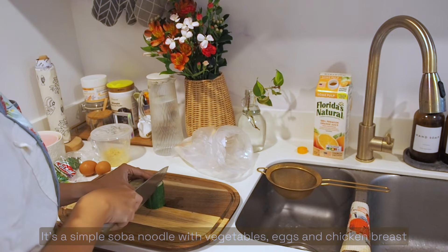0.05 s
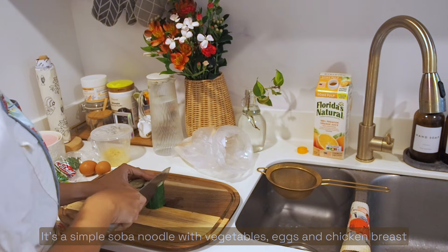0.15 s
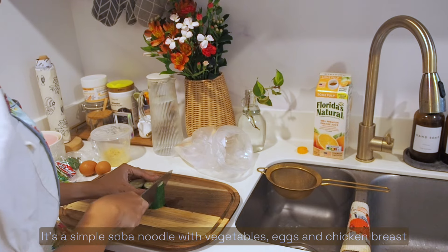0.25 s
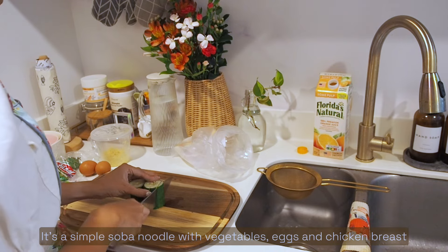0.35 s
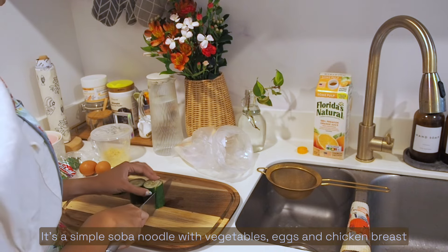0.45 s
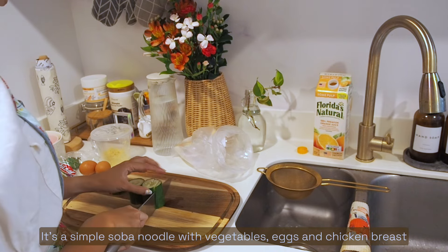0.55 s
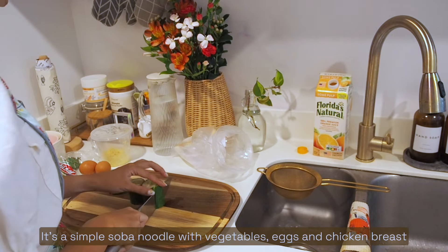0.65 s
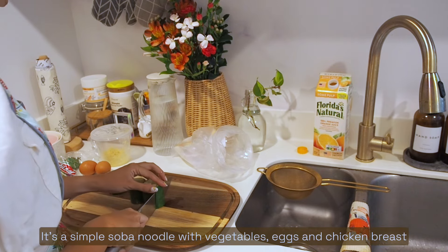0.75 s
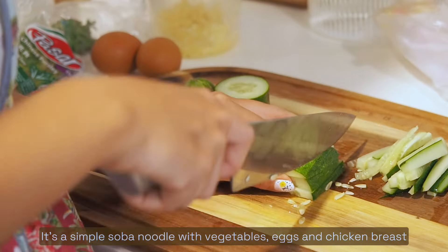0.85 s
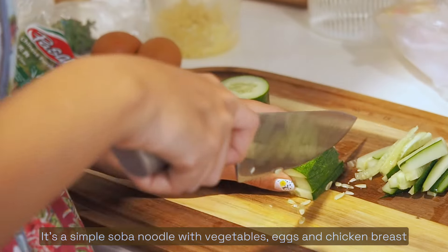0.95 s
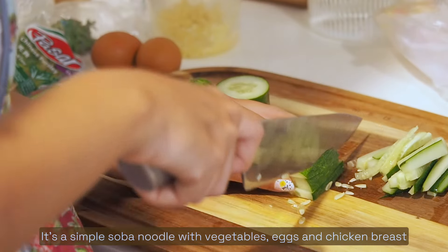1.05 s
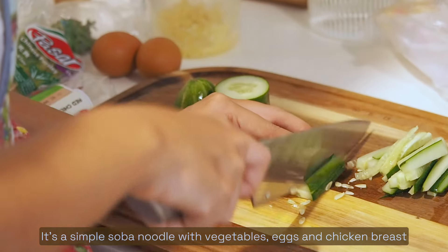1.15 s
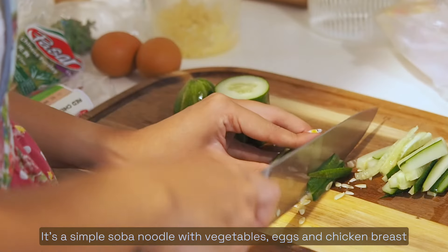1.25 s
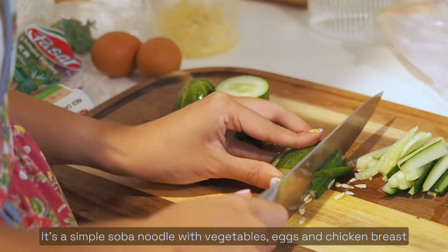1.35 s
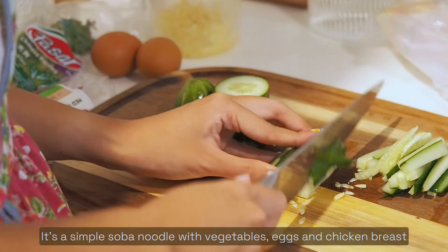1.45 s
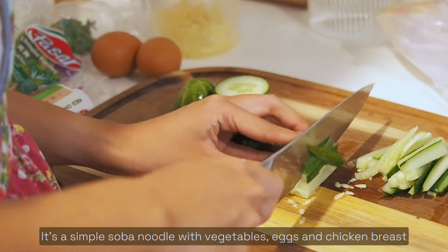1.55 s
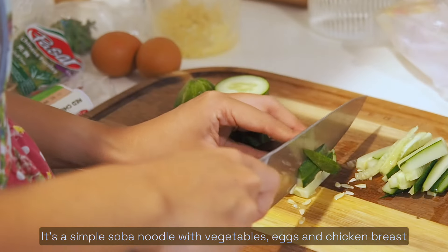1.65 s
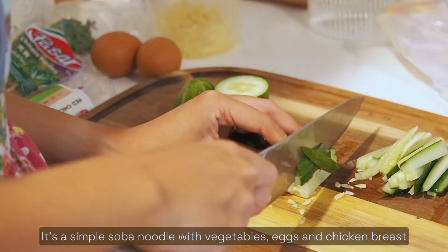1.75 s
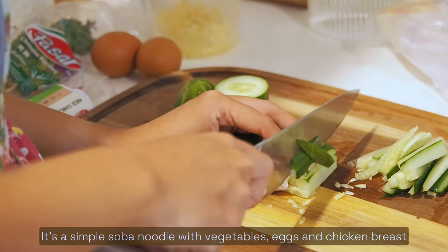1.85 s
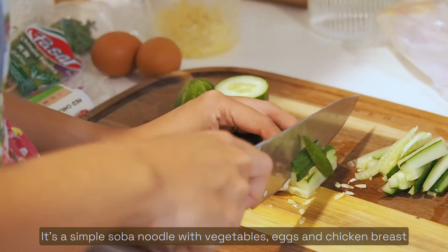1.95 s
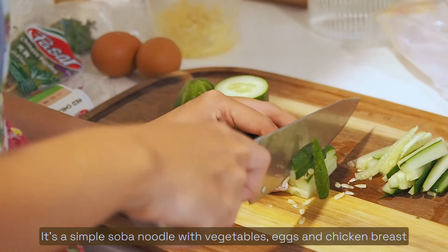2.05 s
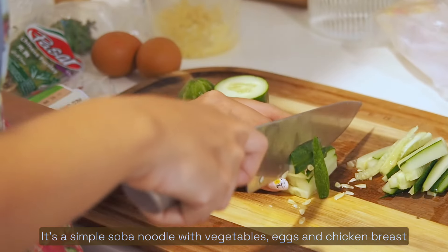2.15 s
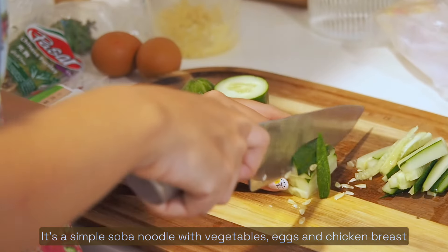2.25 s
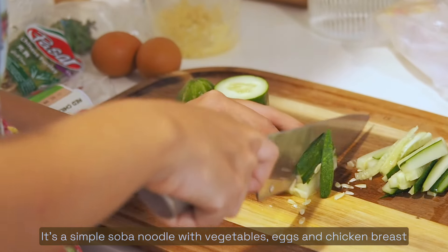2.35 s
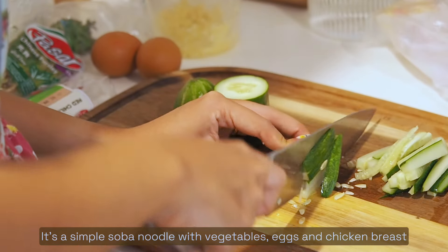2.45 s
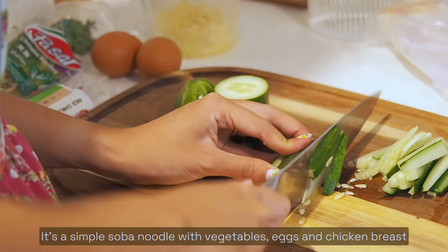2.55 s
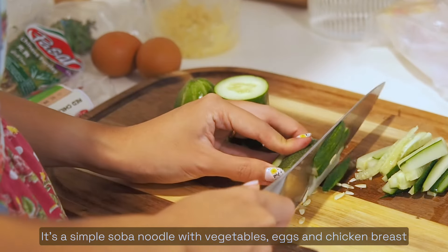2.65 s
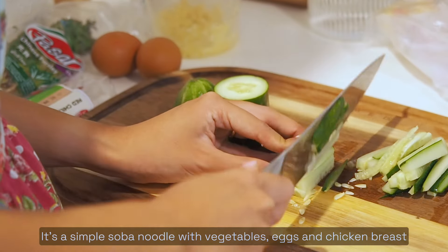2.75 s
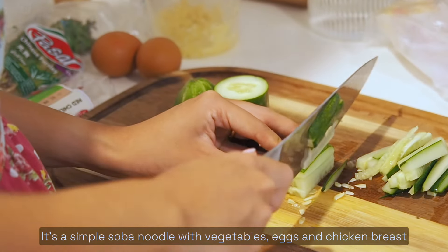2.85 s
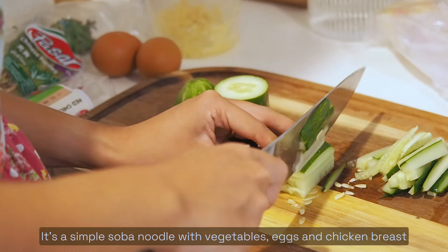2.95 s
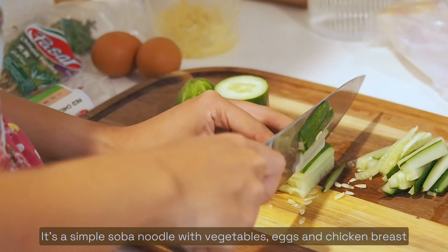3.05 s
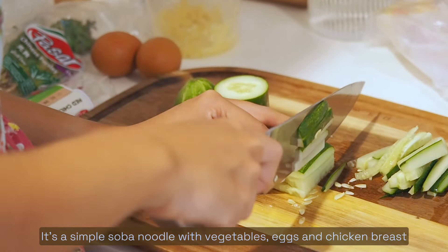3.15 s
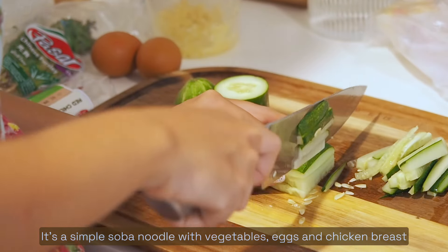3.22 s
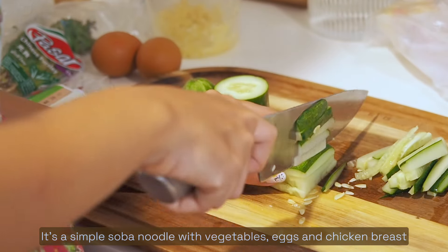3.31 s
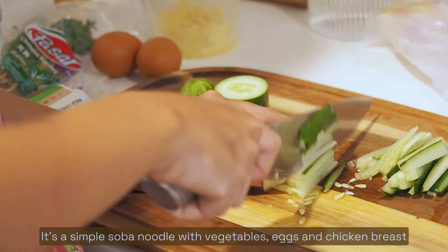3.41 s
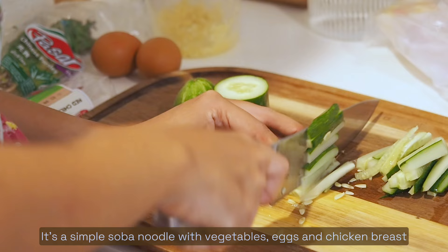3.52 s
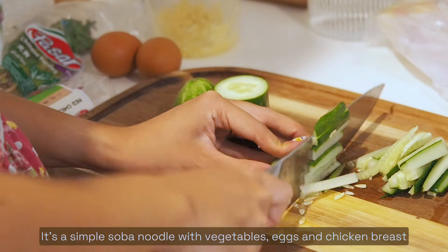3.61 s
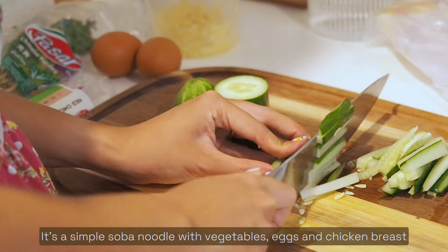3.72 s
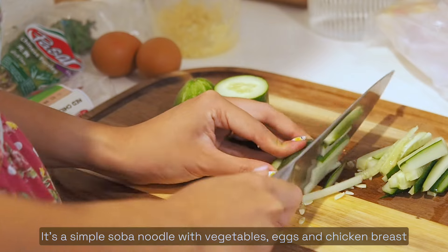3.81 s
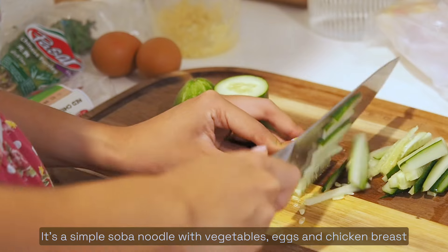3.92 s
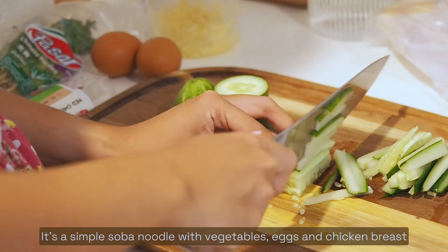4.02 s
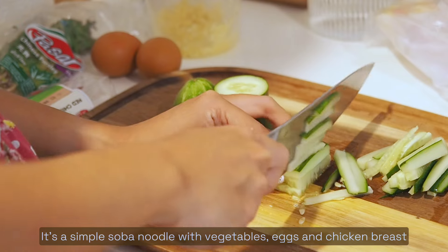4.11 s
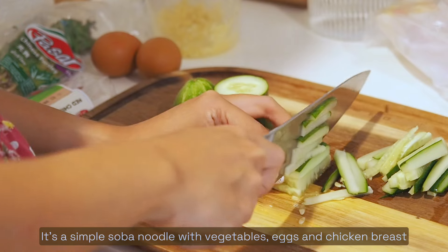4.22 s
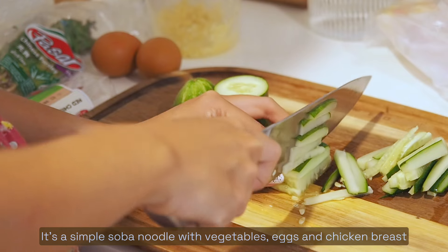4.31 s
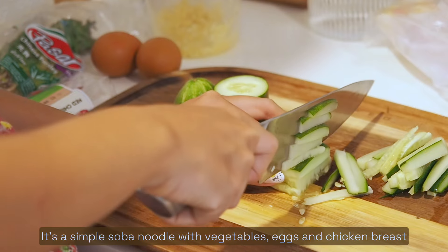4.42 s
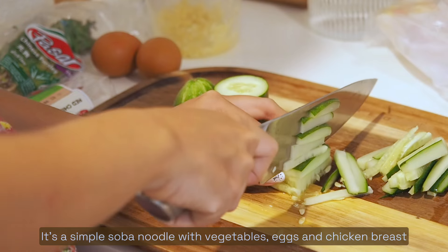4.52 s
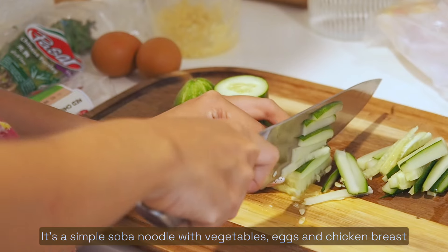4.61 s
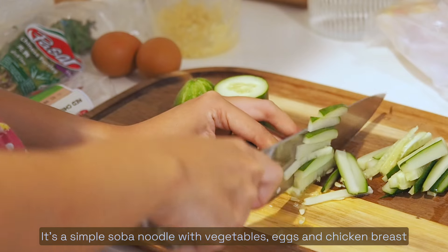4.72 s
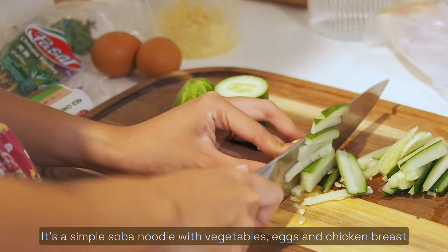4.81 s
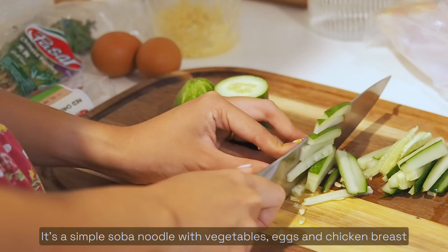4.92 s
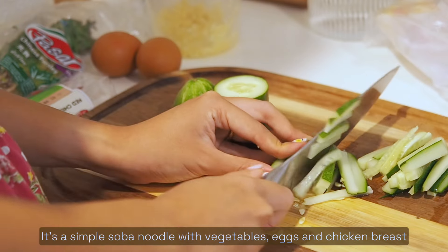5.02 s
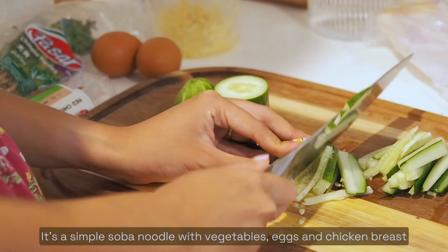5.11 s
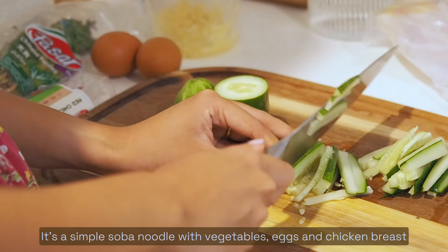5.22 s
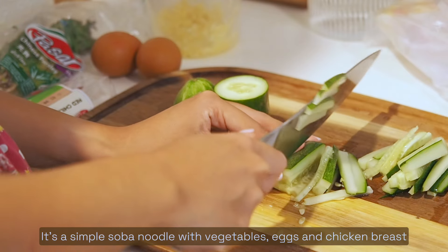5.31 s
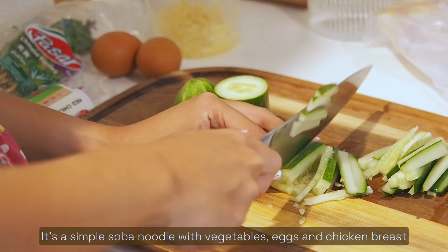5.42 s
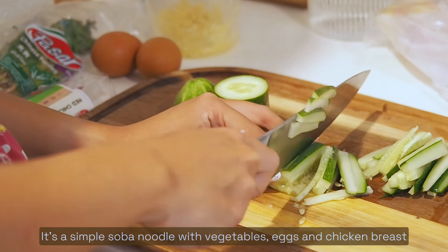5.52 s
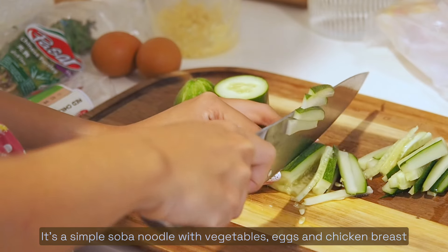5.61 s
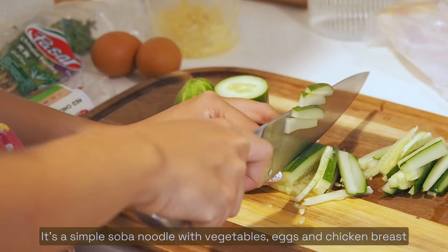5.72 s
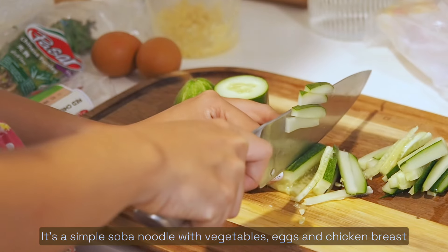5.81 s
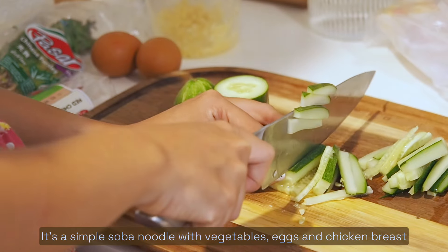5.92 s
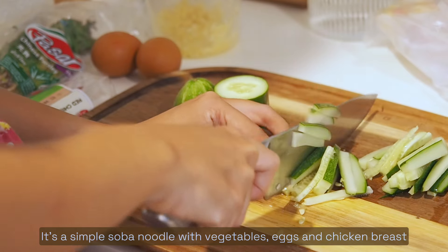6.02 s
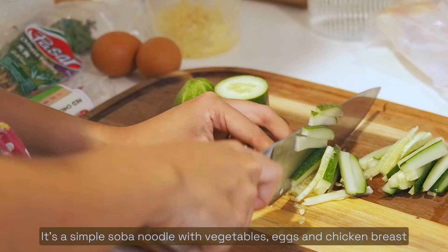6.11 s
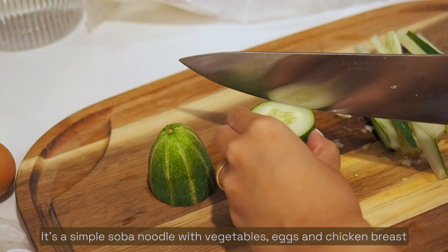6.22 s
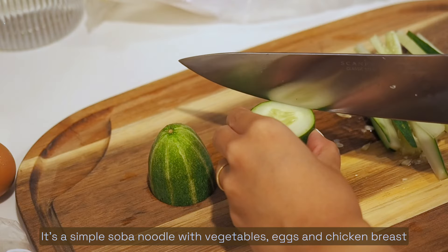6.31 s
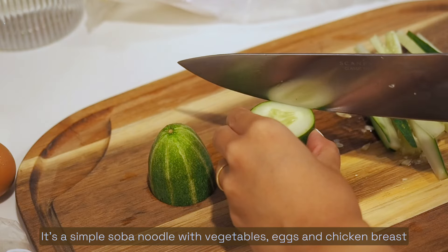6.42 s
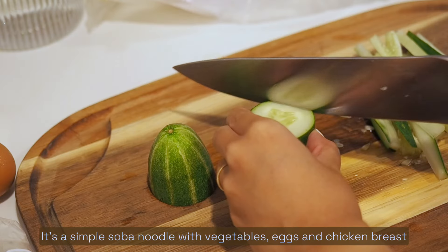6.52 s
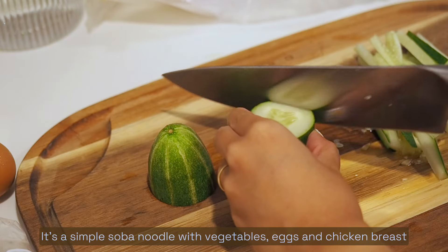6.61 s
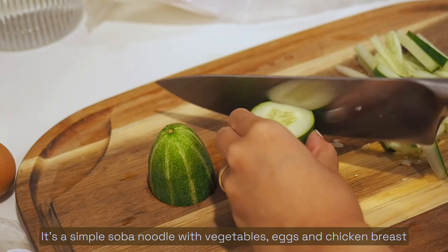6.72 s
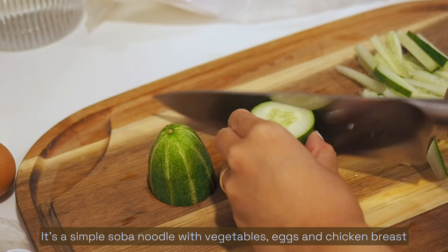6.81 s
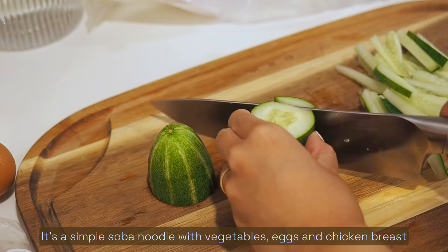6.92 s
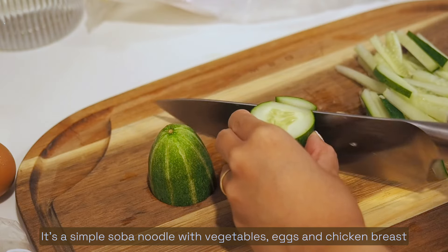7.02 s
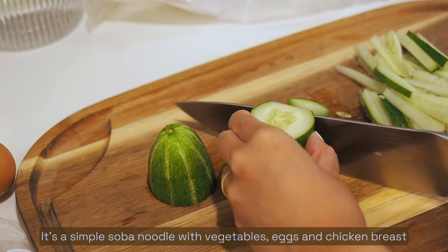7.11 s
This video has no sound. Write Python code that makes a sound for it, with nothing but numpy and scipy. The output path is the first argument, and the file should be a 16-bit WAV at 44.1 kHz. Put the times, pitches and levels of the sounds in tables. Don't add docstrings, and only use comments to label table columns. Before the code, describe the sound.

Slow, spaced cucumber slicing with crisp wet crackle and woody knife knocks, first beside a hissing gas flame, then over low fan noise.

```python
import sys
import numpy as np
from scipy import signal
from scipy.fft import rfft, irfft, next_fast_len
from scipy.io import wavfile

SR = 44100
rng = np.random.default_rng(int(sys.argv[2]) if len(sys.argv) > 2 else 0)


def invert_db(level):
    return 10 ** (np.asarray(level, dtype=float) / 20)


def store_wav(level_fs):
    pcm = np.round(np.clip(np.atleast_2d(level_fs), -1, 1) * 32767)
    wavfile.write(sys.argv[1], SR, pcm.T.astype(np.int16))


N = 315756

# start t/s, end t/s
SHOTS = [
    (0.0, .881),
    (.885, 6.18),
    (6.181, 7.2),
]

# f/Hz, level/dB (per Hz)
BURNER_SPECTRUM = [(18, -43), (30, -12), (98, -7), (127, -17), (203, -8), (402, -19), (550, -12),
                   (1240, -11.5), (1410, -7.5), (1610, -13.5), (3270, -13), (7960, -22), (10300, -23),
                   (15700, -29)]
# f/Hz, width/Hz, level/dB
BURNER_RESONANCES = [(2556, 80, -11.5), (3170, 260, -19.5), (3390, 420, -7.5), (3820, 180, -13),
                     (7800, 230, -11.5)]
# t/s, hiss level/dB
JET_LEVEL = [(0, -41.5), (.39, -39.5), (.56, -43.5), (.88, -41)]
# start t/s, end t/s, entry level/dB, final level/dB
PORT_SONGS = [(-.05, .12, -49, -54), (0.165, .3, -43, -50), (.3, .6, -52, -56), (.62, .88, -43, -49.5)]

# f/Hz, level/dB (per Hz)
SLICE_SPECTRUM = [(710, -21), (1200, -8), (1950, -6.5), (2700, -4.5), (5800, -2.5), (10200, -3),
                  (13000, -6), (14600, -9), (15300, -14), (15800, -22)]
# start t/s, end t/s, entry level/dB, final level/dB, brightness/dB
STROKES = [(-.05, 0.428, -49, -46, 5), (0.59, 0.853, -48, -55, 3), (0.972, 1.17, -51.5, -42, -3),
           (1.21, 1.307, -47.5, -52.5, -5), (2.217, 2.39, -45.5, -44.5, -4),
           (2.41, 2.553, -50, -51.5, -5.5), (3.338, 3.4, -50, -45, -4.5), (3.393, 3.46, -38.5, -38.5, -0.5),
           (3.508, 3.6, -46, -50, -1), (4.54, 4.645, -52, -47, -5.5), (4.643, 4.675, -46, -37, -4.5),
           (5.96, 6.016, -41.5, -36, -2.5), (6.437, 6.688, -49.5, -46.5, -3.5),
           (6.684, 6.862, -47, -36.5, -3.5), (7.018, 7.2, -49, -53.5, -3)]
# t/s, peak level/dB
SNAPS = [(4.4695, -21.5), (4.538, -15.5), (4.5894, -34), (5.2085, -24), (5.44, -29), (5.866, -23.5),
         (6.4517, -32)]

BLOW_TIMES = [
    .4277,
    1.1703,
    2.3797,
    2.5860,
    3.4783,
    4.6889,
    6.0099,
    6.8732,
]
# peak level/dB, thud level/dB, edge level/dB, extra damping/(dB per s)
BLOWS = [(-5.5, -14, -0.5, 26), (-9.5, -0.5, 2, 9), (-11.5, 0, 0.5, 12), (-24.5, 2, 5, 16),
         (-17, 2, -0.5, -15), (1, -11, -9.5, 15), (-2.5, -3.5, 2, -3), (-12, -4, 2, 9)]
LANDINGS = ["far", "soft", "soft", "heel", "stack", "hard", "hard", "tip"]
DIRECT_CLICKS = [-6.5, -7, -7, -5.5, -9, -3, -2, -6.5]
CONTACT_CUTOFF = {"far": 3000, "soft": 3700, "stack": 3000, "heel": 2800, "hard": 6560, "tip": 3530}
# delay t/s, level/dB
HEEL_ROCKING = [
    (.0125, -5.5),
    (.023, -4),
    (.05, -12),
]

# f/Hz, level/dB, t60/s
MODES_FAR = [(482, 0, .3), (517, -1, .3), (580, -4, .27), (640, -6, .27), (732, -3, .07), (797, -8, .2),
             (838, -4, .25), (940, -6, .18), (1120, -9, .22), (1370, -5, .12), (1470, -7, .11),
             (1674, -18, .25), (2003, -20, .2), (2450, -20, .15)]
# f/Hz, level/dB, t60/s
MODES_SOFT = [(237, -13, .4), (315, -14, .45), (385, -5, .15), (515, -4, .22), (575, -3, .25),
              (637, -4, .4), (836, -6, .25), (910, -3, .15), (958, 0, .16), (1120, -7, .2),
              (1324, -14, .25), (1860, -15, .2), (2290, -12, .12), (3480, -22, .08)]
# f/Hz, level/dB, t60/s
MODES_HEEL = [(113, -8, .45), (215, 0, .25), (301, -5, .45), (365, -4, .35), (446, -3, .35), (510, -8, .3),
              (958, -18, .2), (1771, -12, .12), (2100, -14, .06)]
# f/Hz, level/dB, t60/s
MODES_STACK = [(231, -8, .25), (318, -18, .42), (484, -3, .34), (512, -5, .34), (570, -7, .3),
               (635, -8, .32), (721, -2, .12), (840, -3, .15), (930, -5, .15), (1120, -9, .2),
               (1324, -22, .3), (2062, -20, .15), (2320, -15, .08)]
# f/Hz, level/dB, t60/s
MODES_HARD = [(188, -12, .5), (395, -14, .4), (506, -6, .33), (563, 0, .2), (725, -9, .35), (840, -11, .25),
              (910, -5, .33), (958, -5, .2), (1120, -4, .28), (1225, -9, .15), (1320, -9, .24),
              (1490, -12, .2), (1663, -15, .45), (1857, -6, .14)]
# f/Hz, level/dB, t60/s
MODES_BLADE = [(2008, -5, .4), (2132, 2, .12), (2347, 5, .13), (2530, 1, .21), (2670, 4, .1),
               (2885, -4, .3), (3235, -8, .3), (3343, 0, .3), (3418, -1, .09), (3600, -2, .2),
               (4091, -5, .08), (4484, -3, .13), (4716, -6, .35), (5276, -8, .12)]
# f/Hz, level/dB, t60/s
MODES_TIP = [(409, -2, .31), (500, -8, .35), (565, -8, .42), (630, -6, .4), (700, -5, .3), (790, -8, .35),
             (888, 0, .16), (1066, -9, .25), (1130, -4, .18), (1254, -6, .1), (1432, -16, .3),
             (1653, -16, .2), (1965, -14, .15), (2126, -20, .2)]

# f/Hz, level/dB (per Hz)
ROOM_FAR = [(71, -57), (120, -17), (393, -3.5), (499, -0.5), (700, -4), (900, -1.5), (1400, -6), (1750, -8),
            (2300, -12), (2750, -35), (4500, -52), (7700, -90)]
# f/Hz, level/dB (per Hz)
ROOM_SOFT = [(71, -54), (120, -23), (230, -10), (330, -12), (430, -7.5), (580, -2), (770, -10.5),
             (941, -5.5), (1250, -12), (1600, -31), (1900, -17), (2350, -15), (2800, -28), (6500, -34)]
# f/Hz, level/dB (per Hz)
ROOM_HEEL = [(29, -36), (50, -7), (318, 3.5), (620, -8), (711, -19), (889, -11), (1320, -15), (1540, -29),
             (1790, -12), (3000, -29), (3900, -67), (6600, -120)]
# f/Hz, level/dB (per Hz)
ROOM_STACK = [(71, -54), (120, -33), (199, -10), (365, -20), (481, -4), (777, -8), (1000, -7), (1570, -25),
              (2300, -15), (2900, -30), (4160, -50), (7040, -100)]
# f/Hz, level/dB (per Hz)
ROOM_HARD = [(35, -57), (60, -21), (193, -11), (277, -20.5), (569, -6.5), (700, -11.5), (1120, -8.5),
             (1500, -15.5), (2200, -12.5), (3550, -17.5), (3800, -27.5), (4600, -21), (6500, -33),
             (13000, -43)]
# f/Hz, level/dB (per Hz)
ROOM_TIP = [(88, -45), (150, -6.5), (345, -12.5), (402, 0), (487, -7), (878, -9.5), (1130, -12.5),
            (1800, -22.5), (3200, -31), (4160, -59), (7040, -120)]
# f/Hz, t60/s
REVERBERATION = [(100, 0.55), (200, 0.42), (300, 0.37), (500, 0.43), (950, 0.41), (2000, 0.32),
                 (3450, 0.44), (3900, 0.33), (5500, 0.38), (8500, 0.24)]

# f/Hz, level/dB (per Hz)
FAN_AIR_SPECTRUM = [(150, -5.5), (260, -1), (340, -7.5), (420, -4), (520, -3), (650, 0), (1100, -1.5),
                    (1900, -5.5), (2150, -10.5), (4500, -14.5), (7000, -16), (9300, -16), (12600, -18),
                    (15700, -21)]
# f/Hz, level/dB (per Hz)
FAN_RUMBLE_SPECTRUM = [(12, -46), (20, -8), (22, -14), (59, 2), (242, 2.5), (278, -20.5), (315, 3.5),
                       (336, -26), (400, -5.5), (520, -7.5), (880, -120)]
# f/Hz, width/Hz, level/dB
DUCT_RESONANCES = [(148.6, 9.8, -27), (723, 4.3, -14), (1417, 39, -12), (1745, 31, -14.5),
                   (3590, 16, -21.5), (4164, 55, -22), (4780, 35, -19), (5860, 10, -26.5), (8400, 770, -15),
                   (9300, 190, -14)]
# f/Hz, width/Hz, level/dB
LAST_SHOT_RESONANCES = [(82.9, 4.6, -6.5), (136.6, 15, -6.5), (12600, 400, -16)]
# air level/dB, rumble level/dB, drift/(dB per s)
FAN_BY_SHOT = [
    (-44.5, -47, -0.24),
    (-47, -47.5, 2.5),
]

# f/Hz, correlation
LIKENESS = [(60, 0.94), (300, 0.93), (800, 0.82), (2000, 0.22), (5000, 0.015), (12000, 0.014)]
# f/Hz, left minus right level/dB
CAPSULE_BALANCE = [(60, 2), (180, 0), (550, 1.5), (1650, 0), (4970, 1), (15000, 1.0)]
# f/Hz, width/Hz, share removed
HOUSING_NOTCHES = [(6540, 820, 0.93), (10330, 1090, 1), (10450, 1600, 0.72)]


def rms_one(x):
    return x / np.sqrt(np.mean(x ** 2) + 1e-20)


def at_hz(points, hz):
    f, value = np.transpose(points)
    return np.interp(np.log(hz), np.log(f), value)


def butterworth(x, order, hz, kind="low"):
    return signal.sosfilt(signal.butter(order, hz, kind, fs=SR, output="sos"), x)


def spectrum_axis():
    size = next_fast_len(N)
    return size, np.maximum(np.arange(size // 2 + 1) * SR / size, 1)


def shot(k):
    start, end = SHOTS[k]
    t = np.arange(N) / SR
    return np.clip((t - start) / 0.01 + (k == 0), 0, 1) * np.clip((end - t) / 0.002, 0, 1)


def swell(start, end, entry_db, final_db, rise_s, fade_db_per_s):
    t = np.arange(N) / SR
    level_db = np.interp(t, [start, end], [entry_db, final_db])
    level_db = level_db - fade_db_per_s * np.maximum(t - end, 0)
    return np.clip((t - start) / rise_s, 0, 1) * invert_db(level_db)


def drift(rate_hz):
    knots = rng.standard_normal(int(N / SR * 40) + 2)
    r = np.exp(-2 * np.pi * min(rate_hz, 15) / 40)
    walk = rms_one(signal.lfilter([1], [1, -r], knots))
    return np.interp(np.arange(N) / SR * 40, np.arange(len(knots)), walk)


def stereo(mid, side, alike):
    return np.sqrt(1 + alike) * mid + np.sqrt(1 - alike) * side * [[1], [-1]]


def coloured(spectrum, white, wide=1.0):
    size, hz = spectrum_axis()
    alike = np.clip(1 - wide * (1 - at_hz(LIKENESS, hz)), 0, 1)
    mid, side = rfft(white, size) * invert_db(at_hz(spectrum, hz))
    return rms_one(irfft(stereo(mid, side, alike), size)[:, :N])


def resonances(peaks, flicker_db):
    out, white = 0, coloured([(10, 0), (22000, 0)], rng.standard_normal((2, N)))
    for hz, width_hz, level_db in peaks:
        b, a = signal.iirpeak(hz, hz / width_hz / 1.55, SR)
        tone = rms_one(signal.lfilter(b, a, signal.lfilter(b, a, white)))
        out = out + tone * invert_db(level_db + flicker_db * drift(3.7))
    return out


def singing_port():
    carrier = np.exp(2j * np.pi * 1453 * np.arange(N) / SR)
    noise = rng.standard_normal(N) + 1j * rng.standard_normal(N)
    waver = signal.lfilter([1], [1, -.9987], noise)
    breath = 1.7 + rms_one(waver.real) + 1j * rms_one(waver.imag)
    sings = sum(swell(*row, rise_s=0.046, fade_db_per_s=120) for row in PORT_SONGS)
    return sings * rms_one((carrier * breath).real)


def burner():
    hiss_db = np.interp(np.arange(N) / SR, *np.transpose(JET_LEVEL))
    jet = coloured(BURNER_SPECTRUM, rng.standard_normal((2, N)), wide=1.2)
    jet = jet + resonances(BURNER_RESONANCES, flicker_db=-0.5)
    return invert_db(hiss_db + 5.0) * jet + invert_db(1.5) * singing_port()


def bursting_cells():
    fires = rng.random((2, N)) < 2500 / SR
    strength = invert_db(1.9 * np.minimum(rng.exponential(1, (2, N)), 4))
    bursts = fires * strength * rng.choice([-1, 1], (2, N))
    crunch = coloured(SLICE_SPECTRUM, 0.8 * rms_one(bursts) + rng.standard_normal((2, N)), wide=0.82)
    sheen = butterworth(crunch, 2, 12400, "high")
    return crunch + shot(2) * (invert_db(5) - 1) * sheen


def slicing():
    t = np.arange(N) / SR
    power = np.array([swell(*row[:4], rise_s=0.018, fade_db_per_s=200) ** 2 for row in STROKES])
    brightness_db = np.array(STROKES)[:, 4]
    top_gain = np.sqrt(power.sum(axis=0))
    body_gain = np.sqrt(invert_db(-2 * brightness_db) @ power)
    crunch = bursting_cells()
    low = butterworth(crunch, 2, 5000)
    high = crunch - low
    strokes = invert_db(3.5 + 1.5 * drift(15)) * (top_gain * high + body_gain * low)

    snap_gain = np.zeros(N)
    for s, peak_db in SNAPS:
        rise = np.clip((t - s) / .004 + 1, 0, 1)
        snap_gain += invert_db(peak_db - 13) * np.exp(-np.maximum(t - s, 0) / .007) * rise
    snaps = snap_gain * butterworth(low + invert_db(-6.5) * high, 3, 2600, "high")

    tick_s, tick_decay_s = 6.0102, 0.0066
    tick_gain = invert_db(-30) * np.exp(-np.maximum(t - tick_s, 0) / tick_decay_s) * (t >= tick_s)
    return strokes + snaps + tick_gain * high


def board_modes(modes, ring_db, t):
    out, loudest = np.zeros((2, len(t))), max(level_db for hz, level_db, t60 in modes)
    rise = 1 - np.exp(-t / .0008)
    for (hz, level_db, t60), lean in zip(modes, rng.normal(0, 1, len(modes))):
        phase = 0.14 * lean * np.sqrt(hz / 500) * np.array([[1], [-1]])
        decay = invert_db(level_db - loudest + ring_db - 60 * t / np.clip(t60, .05, 0.53))
        out += decay * np.sin(2 * np.pi * hz * t + phase) * rise
    return out


def room_tail(excitation, crack_db, t):
    out = np.zeros((2, len(t)))
    for hz in np.geomspace(60, 13000, 48):
        noise = rng.standard_normal((2, len(t) + SR // 10))
        mid, side = butterworth(noise, 3, [hz / 1.059, hz * 1.059], "band")[:, SR // 10:]
        crack = invert_db(crack_db) * butterworth(t == 0, 2, [hz / 1.25, hz * 1.03], "band")
        alike = np.clip(at_hz(LIKENESS, hz) + 0.21 * np.exp(-t / 0.028), 0, 1)
        early = 0.53 * np.exp(-t / 0.015)
        rattle = 1.43 / (1 + (2500 / hz) ** 2) * np.exp(-(t / 0.0059) ** 2)
        buildup = 1 - np.exp(-t * hz / 0.75)
        dying = invert_db(-60 * t / at_hz(REVERBERATION, hz)) * (1 + early + rattle) * buildup
        out += invert_db(at_hz(excitation, hz) + 16.5) * (stereo(mid, side, alike) * dying + crack)
    return out


def knock_response(modes, excitation, ring_db, crack_db):
    t = np.arange(int(.5 * SR)) / SR
    out = board_modes(modes, ring_db, t) + room_tail(excitation, crack_db, t)
    return out / np.sqrt(np.mean(out[:, :int(.03 * SR)] ** 2)) / 3


def rocking(touch):
    out = touch
    for lag_s, level_db in HEEL_ROCKING:
        later = np.pad(touch, ((0, 0), (round(lag_s * SR), 0)))[:, :SR // 2]
        out = out + invert_db(level_db) * later
    return out


def chops():
    hard_modes = MODES_HARD + [(hz, level_db - 19, t60) for hz, level_db, t60 in MODES_BLADE]
    bodies = {"far": knock_response(MODES_FAR, ROOM_FAR, ring_db=2.5, crack_db=4.0),
              "hard": knock_response(hard_modes, ROOM_HARD, ring_db=-1.5, crack_db=25.0),
              "soft": knock_response(MODES_SOFT, ROOM_SOFT, ring_db=-1.0, crack_db=10.0),
              "stack": knock_response(MODES_STACK, ROOM_STACK, ring_db=-1.5, crack_db=6.0),
              "heel": rocking(knock_response(MODES_HEEL, ROOM_HEEL, ring_db=1.5, crack_db=3.0)),
              "tip": knock_response(MODES_TIP, ROOM_TIP, ring_db=-1.0, crack_db=10.0)}
    click = butterworth(np.arange(SR // 2) == 0, 2, [900, 3000], "band")
    click = click / click.max()
    out = np.zeros((3, 2, N + SR))
    for s, blow, spot, direct_db in zip(BLOW_TIMES, BLOWS, LANDINGS, DIRECT_CLICKS):
        peak_db, thud_db, edge_db, damping_db = blow
        k = sum(s > end for start, end in SHOTS)
        body = butterworth(bodies[spot] + invert_db(direct_db) * click, 4, CONTACT_CUTOFF[spot])
        thud = butterworth(body, 1, 300)
        edge = butterworth(body, 1, 1800, "high")
        knock = body + (invert_db(thud_db) - 1) * thud + (invert_db(edge_db) - 1) * edge
        length = body.shape[1]
        damping = invert_db(-damping_db * np.arange(length) / SR)
        at = round(s * SR)
        out[k, :, at:at + length] += invert_db(peak_db + 0.5) * knock * damping
    return sum(shot(k) * out[k, :, :N] for k in range(3))


def fan():
    t = np.arange(N) / SR
    k = (t > SHOTS[2][0]).astype(int)
    air_db, rumble_db, drift_db_per_s = np.transpose(FAN_BY_SHOT)[:, k]
    drift_db = drift_db_per_s * (t - np.array(SHOTS)[k + 1, 0])
    air = coloured(FAN_AIR_SPECTRUM, rng.standard_normal((2, N)))
    air = air + resonances(DUCT_RESONANCES, flicker_db=-1.0)
    rumble = coloured(FAN_RUMBLE_SPECTRUM, rng.standard_normal((2, N)))
    rumble = rumble + shot(2) * resonances(LAST_SHOT_RESONANCES, flicker_db=2.0)
    air_gain = invert_db(air_db + drift_db + 1.3 * drift(5.5))
    rumble_gain = invert_db(rumble_db + drift_db + 1.4 * drift(15.0))
    return air_gain * air + rumble_gain * rumble


def scene():
    first, later = shot(0), shot(1) + shot(2)
    return first * burner() + (first + later) * slicing() + chops() + later * fan()


def roll_off(x):
    return signal.sosfilt(signal.butter(12, 15890, fs=SR, output="sos"), x)


def record(dry):
    for hz, width_hz, share in HOUSING_NOTCHES:
        dry = dry - share * signal.lfilter(*signal.iirpeak(hz, hz / width_hz, SR), dry)
    size, hz = spectrum_axis()
    lean = invert_db(at_hz(CAPSULE_BALANCE, hz) / 2)
    response = [lean, 1 / lean] * (hz < 15800)
    mix = irfft(rfft(np.clip(dry, -1, 1), size) * response, size)[:, :N]
    return roll_off(mix - .0027)


dry = scene()
out = record(dry)
store_wav(out)
```